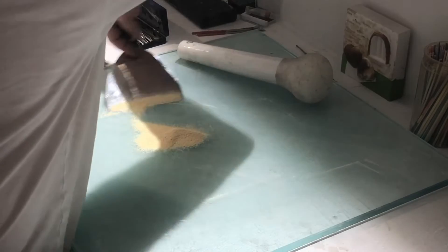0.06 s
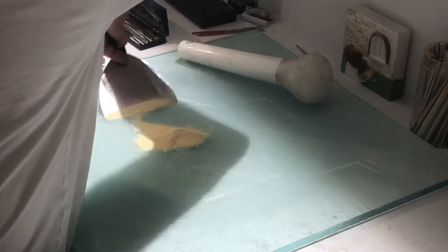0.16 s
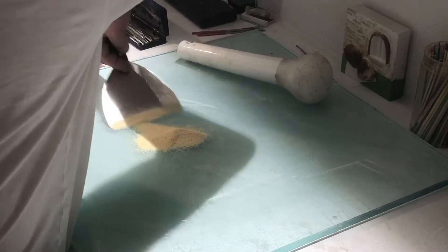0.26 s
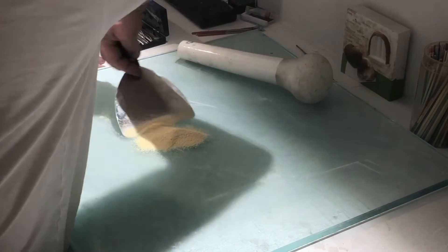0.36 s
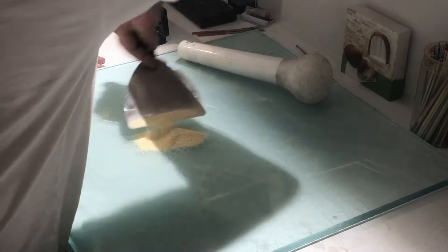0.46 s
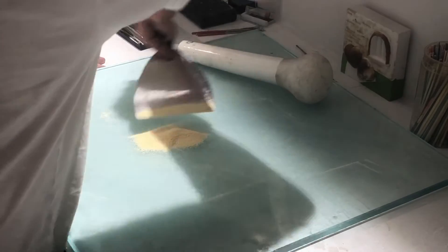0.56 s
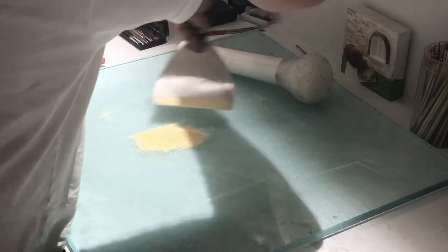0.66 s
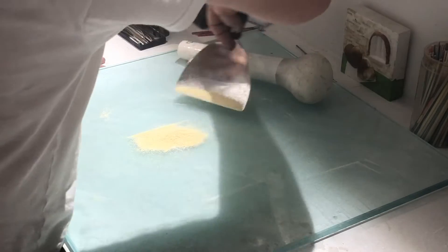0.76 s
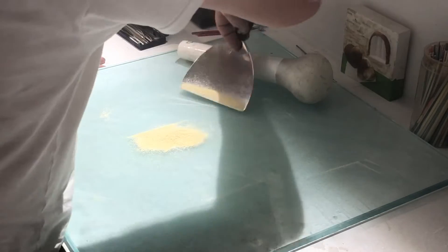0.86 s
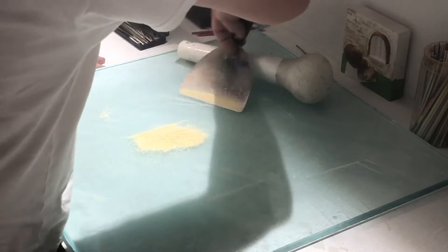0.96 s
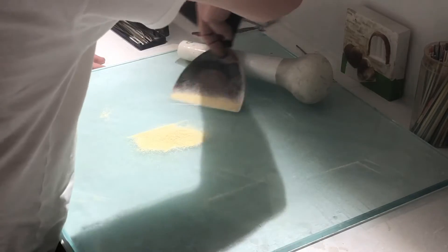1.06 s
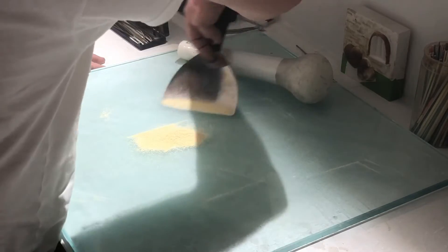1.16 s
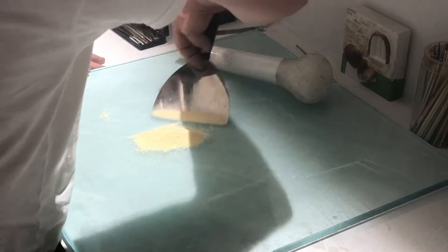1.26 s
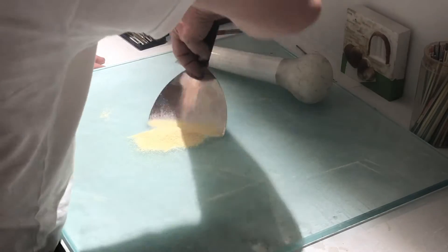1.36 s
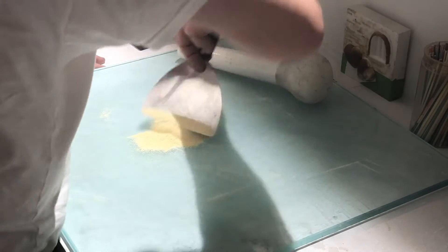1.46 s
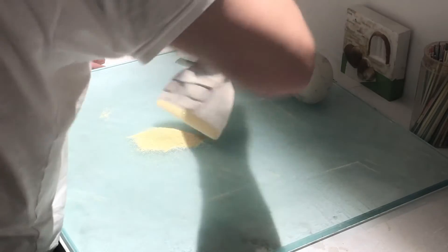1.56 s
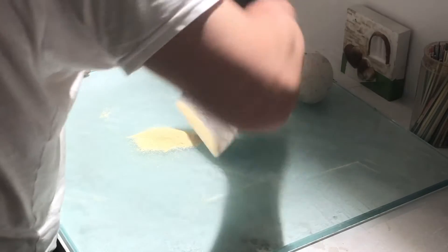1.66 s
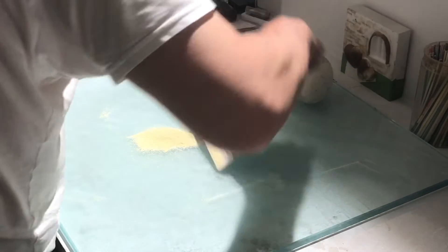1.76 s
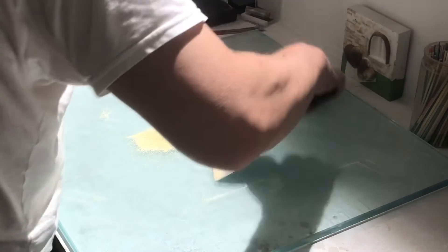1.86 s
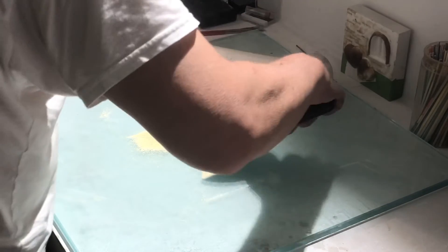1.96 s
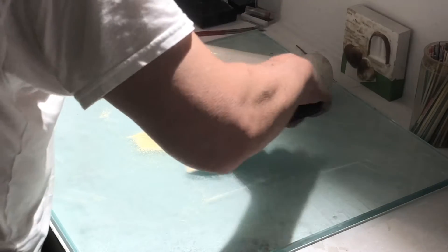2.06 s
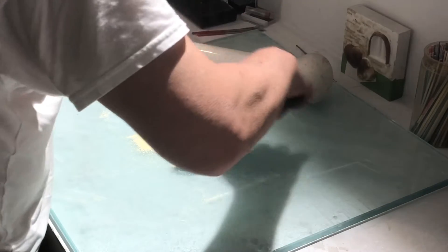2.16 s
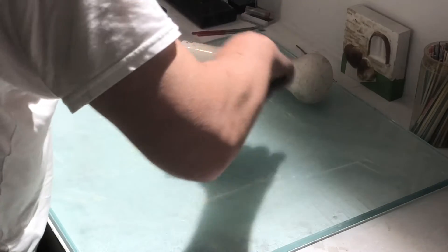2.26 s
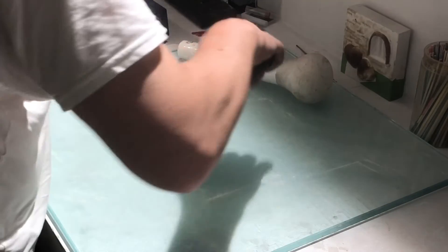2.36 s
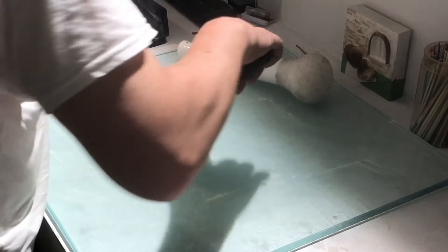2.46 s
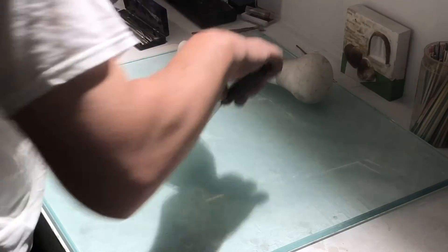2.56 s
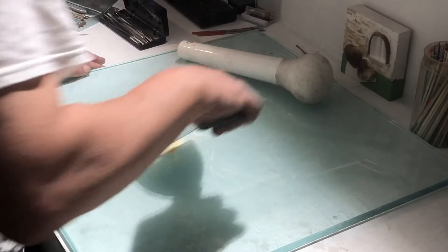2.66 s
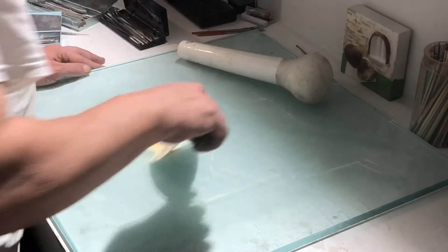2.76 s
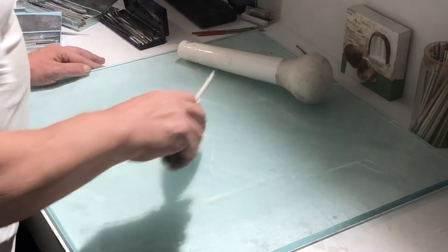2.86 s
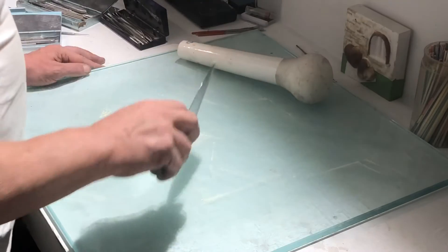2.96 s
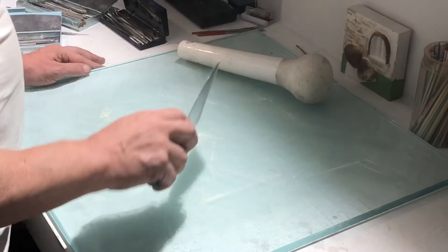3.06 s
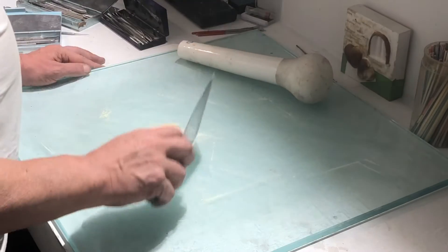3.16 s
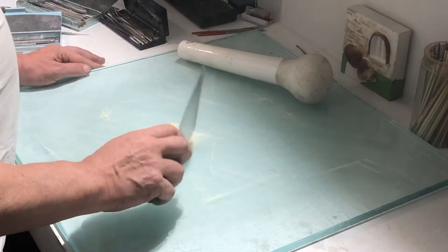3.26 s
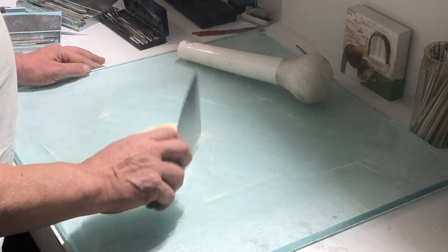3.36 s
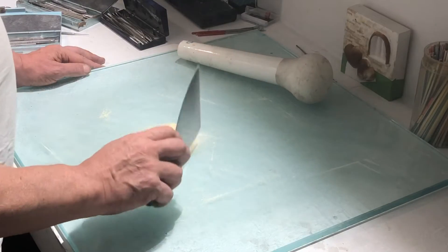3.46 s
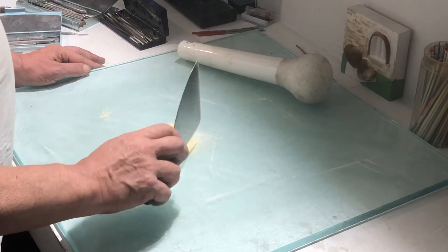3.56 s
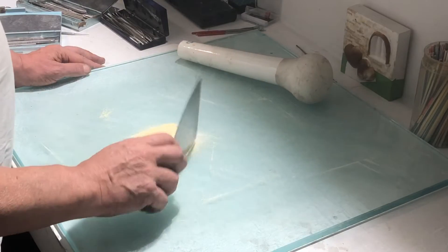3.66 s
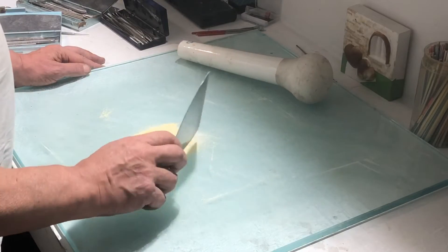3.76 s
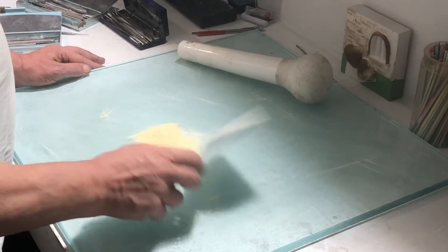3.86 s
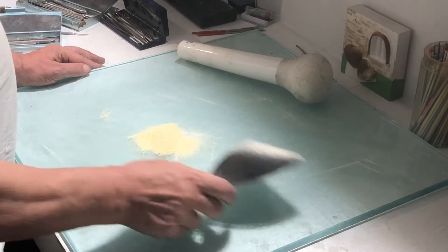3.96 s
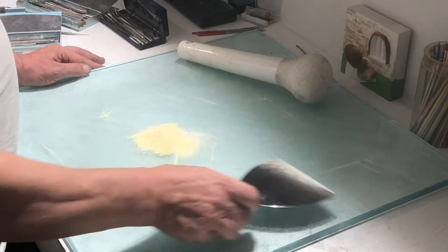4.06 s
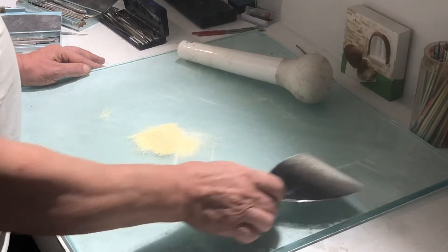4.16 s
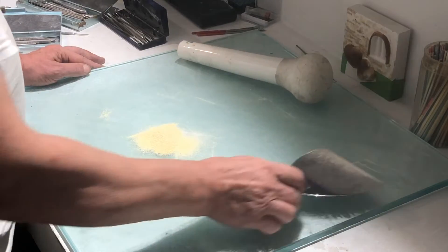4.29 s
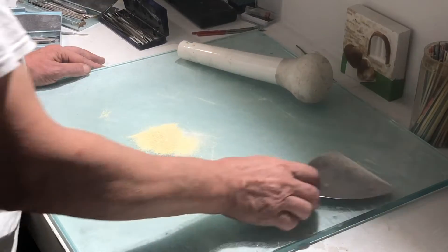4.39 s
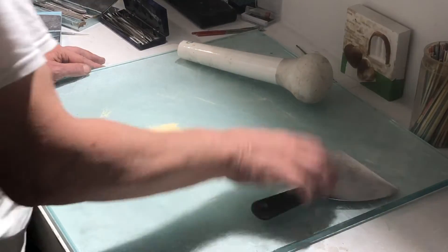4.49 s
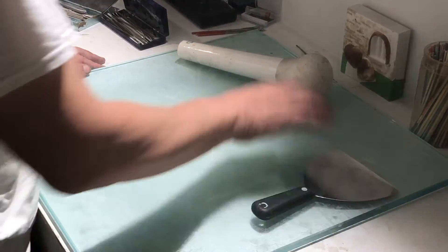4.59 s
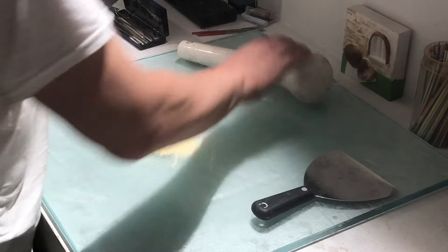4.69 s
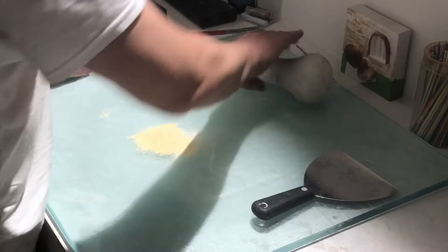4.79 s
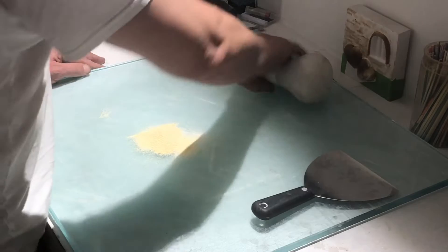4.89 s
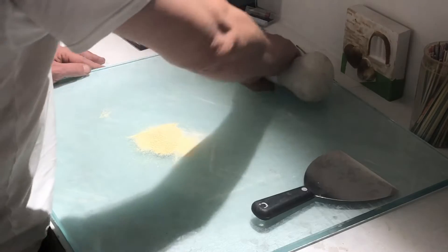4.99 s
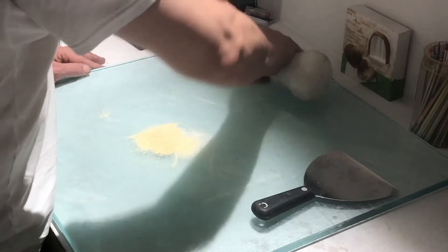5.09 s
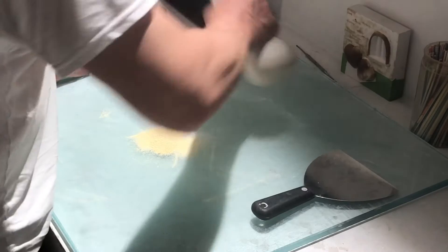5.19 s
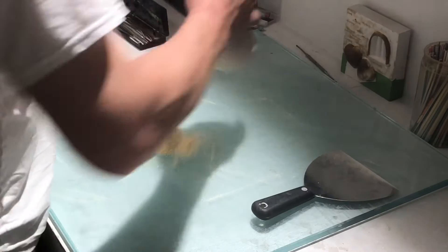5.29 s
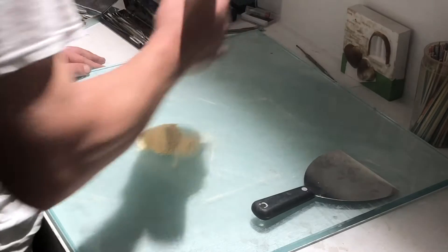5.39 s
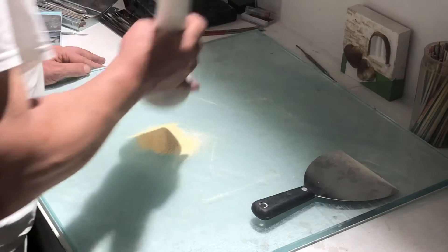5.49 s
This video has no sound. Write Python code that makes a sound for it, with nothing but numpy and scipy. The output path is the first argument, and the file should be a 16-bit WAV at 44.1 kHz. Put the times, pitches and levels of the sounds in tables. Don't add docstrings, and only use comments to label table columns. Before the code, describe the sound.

Close-miked indoors: three faint gritty strokes of a scraper through fine powder, the steel edge singing softly. After near silence come three sharp raps on glass, a bright one and two firmer, with table thump and short room echo. A quick last swish, a light metal clatter as the tool is put down, then barely audible touches as a pestle is lifted over soft air noise.

```python
import sys
import numpy as np
from scipy import signal
from scipy.fft import rfft, irfft, next_fast_len
from scipy.io import wavfile
from scipy.ndimage import uniform_filter1d, map_coordinates

SR = 44100
rng = np.random.default_rng(int(sys.argv[2]) if len(sys.argv) > 2 else 0)


def wav_out(sig):
    wavfile.write(sys.argv[1], SR, np.round(np.clip(np.atleast_2d(sig).T, -1, 1) * 32767).astype(np.int16))


def makeup_ratio(level_db):
    decades = np.asarray(level_db, float) / 20
    return 10 ** decades


N = 243873


def unit(x):
    return x / np.sqrt(np.mean(x ** 2) + 1e-20)


def along(points, hz):
    f, value = np.transpose(points)
    return np.interp(np.log(hz + 1), np.log(f + 1), value)


def wobble(rate):
    knots = rng.standard_normal(int(N * rate / SR) + 4)
    return map_coordinates(knots, [np.arange(N) * rate / SR])


def filtered(x, response):
    m = next_fast_len(len(x) + 8192)
    return irfft(rfft(x, m) * response(np.fft.rfftfreq(m, 1 / SR)), m)[:len(x)]


def coloured(x, spectrum):
    return unit(filtered(x, lambda hz: makeup_ratio(along(spectrum, hz))))


def resonances(peaks):
    def response(f):
        total = 0
        for k, (centre, width, db) in enumerate(peaks):
            loss = 1j * f * width
            total = total + (-1) ** k * makeup_ratio(db) * loss / (centre * centre - f * f + loss)
        return total
    return response


def swell(peak_s, db, rise_s, fall_s):
    t = np.arange(N) / SR - peak_s
    distance = np.where(t < 0, -t / rise_s, t / fall_s)
    return makeup_ratio(db - 27 * distance ** 1.3)


def ring(pitches_hz, modes, t, scatter_db, split):
    db, t60 = np.transpose(modes)[:, :, None]
    chance = rng.standard_normal((3, *db.shape))
    decay = np.exp(-np.log(1000) * t / np.clip(t60, .01, .6))
    level = makeup_ratio(db + scatter_db * chance[0]) * decay
    phase = (2 * np.pi * np.c_[pitches_hz] * t).astype(np.float32)
    twin = (phase * (1 + split * chance[1]) + np.pi * chance[2]).astype(np.float32)
    return (level * (np.sin(phase) + 0.59 * np.sin(twin))).sum(axis=0) / np.sqrt(len(modes))


# f/Hz, t60/s
ROOM = [(200, 0.58), (1000, 0.32), (3000, 0.39), (7000, 0.34), (14000, 0.2)]


def tail():
    hz, t, z = signal.stft(rng.standard_normal(SR // 2), SR, nperseg=256)
    fading = z * makeup_ratio(-60 * t / along(ROOM, hz)[:, None])
    x = signal.istft(fading, SR, nperseg=256)[1]
    return x / np.linalg.norm(x)


# f/Hz, level/dB per Hz
AIR = [(240, -53), (400, -12), (545, -2.5), (755, -2), (1130, -8.5), (1650, -8), (2840, -10), (3420, -16),
       (4500, -19.5), (6000, -20), (7500, -27), (11000, -31), (14600, -33), (16000, -42)]
# f/Hz, level/dB per Hz
SWAY = [(8, -33.5), (16, 2.5), (30, -2), (44, 4.5), (56, -9), (75, -40.5), (200, -120)]
# f/Hz, level/dB per Hz
DRONE = [(35, -35.5), (60, -5), (80, 1.5), (100, -8), (121, 0.5), (140, -6), (165, -15), (250, -10.5),
         (305, -7), (335, -11), (380, -11), (450, -25.5), (580, -40.5), (990, -120)]
# t/s, level/dB, rise/s, fall/s
WHINE_SWELL = (3.5, -82, 3.7, 1.5)


def background():
    air = makeup_ratio(-63.5 + 0.34 * wobble(2.2)) * coloured(rng.standard_normal(N), AIR)
    sway = makeup_ratio(-72.5 + 1.2 * wobble(2.2)) * coloured(rng.standard_normal(N), SWAY)
    drone = makeup_ratio(-71.5 + 0.88 * wobble(4.6)) * coloured(rng.standard_normal(N), DRONE)
    phase = 2 * np.pi * np.cumsum(1595 + 0.74 * wobble(13)) / SR
    whine = (makeup_ratio(-77) + swell(*WHINE_SWELL)) * makeup_ratio(2.1 * wobble(10))
    return air + sway + drone + np.sqrt(2) * whine * np.sin(phase)


def far_rooms():
    late_db, t60 = -38.5, 0.73
    t = np.arange(N) / SR
    level = sum(makeup_ratio(db + late_db - 60 * np.abs(t - s) / t60) * (t > s) for s, db, *_ in KNOCKS)
    return level * coloured(rng.standard_normal(N), AIR)


# t/s, level/dB, rise/s, fall/s
SHAKES = [
    (4.48, -53, 0.058, 0.16),
    (4.95, -58.5, 0.085, 0.14),
    (5.06, -65, 0.065, .04),
]


def shakes():
    shaking = unit(filtered(rng.standard_normal(N), resonances([(77.6, 26, 0)])))
    return sum(swell(*shake) for shake in SHAKES) * shaking


TABLE_HZ = [73, 131, 212, 249.5, 350]
# level/dB, t60/s
TABLE = [(-5, 0.15), (-10.5, 0.14), (-0.5, 0.076), (0, .09), (-11, .07)]
# t/s, peak level/dB
THUDS = [
    (3.171, -41.5),
    (3.414, -38),
    (3.662, -37.5),
    (4.445, -53.5),
    (4.986, -73),
]


def thuds():
    out, t = np.zeros(N + SR), np.arange(SR // 2) / SR
    for s, db in THUDS:
        boom = (1 - np.exp(-t / 0.0039)) * ring(TABLE_HZ, TABLE, t, scatter_db=0.9, split=0.033)
        out[round(s * SR):][:len(t)] += makeup_ratio(db + 7.5) * boom
    return out[:N] + makeup_ratio(-14.0) * signal.fftconvolve(out, tail())[:N]


# t/s, peak level/dB, centre f/Hz, t60/s
TICKS = [(.918, -56, 13100, .015), (.952, -58, 12500, .02), (1.853, -59, 4500, 0.035),
         (1.885, -60, 4500, 0.022), (1.934, -58, 10000, 0.033), (2.068, -53, 12000, .03),
         (2.780, -53, 2500, 0.022), (4.3663, -47.5, 3300, .12), (4.456, -46.5, 1000, 0.26),
         (4.896, -56, 13500, 0.0073), (4.984, -51.5, 1860, 0.075), (5.39, -69, 6560, .02)]


def ticks():
    out, t = np.zeros(N + SR), np.arange(SR // 8) / SR
    for s, db, centre_hz, t60 in TICKS:
        body = resonances([(centre_hz, .45 * centre_hz, 0)])
        puff = unit(filtered(rng.standard_normal(len(t)), body))
        out[round(s * SR):][:len(t)] += makeup_ratio(db - 5.0 - 60 * t / t60) * puff
    return out[:N]


# f/Hz, level/dB per Hz
CRACK = [(150, -38.5), (330, -18), (500, -22.5), (800, -7), (1100, -6), (1400, -9.5), (1850, 2.5),
         (2800, -1), (4400, -1.5), (6500, -8.5), (8700, -13), (11000, -15.5), (15800, -22), (16900, -50)]


def crack(t, t60):
    burst = rng.standard_normal(len(t)) * makeup_ratio(-60 * t / t60)
    uneven = np.sqrt(uniform_filter1d(np.abs(rfft(burst)) ** 2, size=70))
    even = irfft(rfft(burst) / uneven, len(t))
    return 0.086 * coloured(even, CRACK) * (t < 4 * t60)


GLASS_HZ = [651, 762, 945, 1225, 1636, 1867, 2090, 2394, 2856, 3024, 3208, 3715, 4065, 4170, 4341, 4512,
            4680, 5055, 5403, 5790, 5897, 6598, 6970, 7210, 7766, 8487, 8607, 9970]
# level/dB, t60/s
GLASS = [(1, 0.09), (-7, 0.07), (-6.5, 0.06), (-7, 0.09), (0, 0.058), (-9, 0.18), (-13, 0.044),
         (-25.5, 0.045), (-2.5, 0.047), (-8, .07), (-9, .07), (-14, 0.047), (-8, .07), (-5.5, 0.06),
         (-2.5, 0.087), (0.5, .07), (-4.5, 0.074), (-9, .07), (-1.5, .07), (-6, .07), (3, 0.068),
         (-12, 0.08), (2, .07), (-17, .07), (3, .06), (-8, 0.082), (-1, .05), (-14.5, .04)]
BLADE_HZ = [1582, 2395, 3194, 3350, 3458, 3702, 4116, 4370, 4695, 5006, 5532, 5785, 6388, 6530, 7332, 7660,
            7862, 8245, 8660, 9258, 9720, 10675, 11265, 11880, 12513, 13260, 15070]
# delay t/s, level/dB
WALLS = [(.0028, -2), (.0052, -4), (.0105, -7), (.0128, -8), (.019, -13), (.026, -16)]


def contacts(events, blade, glass_db, crack_t60, swell_s, wet_db, alike, lowest_hz, size):
    out, t = np.zeros(N + 2 * SR), np.arange(size) / SR
    spot = crack(t, crack_t60)
    for s, db, treble_db, blade_db, struck_hz in events:
        slab_db = glass_db + min(db + 28, 0)
        snap = alike * spot + np.sqrt(1 - alike ** 2) * crack(t, crack_t60)
        slab = makeup_ratio(slab_db) * ring(GLASS_HZ, GLASS, t, scatter_db=2.5, split=0.014)
        near = (1 - np.exp(-t / swell_s)) * (snap + slab)
        treble = (1 - np.exp(-t / .0003)) * np.diff(snap, n=2, prepend=[0, 0])
        near = near + makeup_ratio(treble_db + 8.5) * treble
        echoes = sum(makeup_ratio(level) * np.roll(near, round(lag * SR)) for lag, level in WALLS)
        favour_db = 11 * np.exp(-(np.log(np.array(BLADE_HZ) / struck_hz) / 0.11) ** 2)
        favoured = blade + np.outer(favour_db, [1, 0])
        near = near + makeup_ratio(blade_db) * ring(BLADE_HZ, favoured, t, scatter_db=0.0, split=.009)
        heard = near + filtered(echoes, lambda hz: 1 / (1 + 1j * hz / 6000))
        heard = heard + makeup_ratio(wet_db) * signal.fftconvolve(near + 0.5 * snap, tail())[:len(t)]
        heard = signal.lfilter(*signal.butter(2, lowest_hz, "high", fs=SR), heard)
        out[round((s - .0004) * SR):][:len(t)] += makeup_ratio(db - 3.5) * heard
    return out[:N]


# level/dB, t60/s
LYING = [(4, 0.059), (-10, 0.56), (-4, 0.11), (3, 0.059), (-3.5, 0.12), (-25, .25), (-25, .2), (-4, 0.16),
         (-3.5, 0.16), (-4.5, 0.18), (-4, 0.16), (-1, 0.098), (-20, 0.18), (2, 0.083), (-6, .15), (-19, .2),
         (-22, 0.19), (-27, 0.16), (-24, .1), (-11, 0.18), (-3, 0.097), (-9, .13), (-8, 0.096), (0, .1),
         (-1, .1), (-17, .1), (-14, .07)]
# t/s, peak level/dB, treble level/dB, blade ring level/dB, favoured f/Hz
RATTLE = [(4.444, -29.5, -21, -3.5, 3330), (4.4555, -32.5, -4, 6.5, 9800), (4.463, -29, 0, -19, 5500),
          (4.485, -38, 0.5, 0.5, 4900), (4.495, -38.5, -3, -20, 9700), (4.512, -40, -3, -10, 5420),
          (4.545, -71, -18, 1.5, 7800), (4.568, -70, -18, -2, 4730), (4.588, -52, -15, 1, 5100)]


def rattle():
    rocking = contacts(RATTLE, LYING, glass_db=-5.5, crack_t60=0.016, swell_s=0.001, wet_db=-7,
                       alike=0.074, lowest_hz=794, size=SR // 4)
    rest_s, damping_db_per_s = 4.62, 300
    resting_s = np.clip(np.arange(N) / SR - rest_s, 0, 1)
    return rocking * makeup_ratio(-damping_db_per_s * resting_s)


# level/dB, t60/s
HELD = [(-24.5, .2), (-14, .4), (-14, 0.17), (-12, 0.36), (-13.5, 0.36), (-7.5, 0.15), (-18, 0.36),
        (-19.5, 0.28), (-8, 0.5), (-9, .22), (-10, 0.5), (-8, .25), (-16, .25), (3.5, .15), (-7.5, .22),
        (-12, .15), (-9, 0.1), (-12, .2), (-2, .08), (7.5, 0.11), (-13.5, 0.14), (-0.5, .15), (-1.5, 0.14),
        (-14.5, .1), (-10.5, .09), (1, 0.13), (-10, .07)]
# t/s, peak level/dB, treble level/dB, blade ring level/dB, favoured f/Hz
KNOCKS = [
    (3.170, -21, -6, -3, 3440),
    (3.4119, -11.5, -36.5, -18, 6800),
    (3.660, -11.5, -34, -30.5, 6870),
]


def knocks():
    return contacts(KNOCKS, HELD, glass_db=-3.5, crack_t60=0.022, swell_s=0.00096, wet_db=-12,
                    alike=0.89, lowest_hz=253, size=SR // 2)


def grit(spread_db):
    return unit(rng.standard_normal(N) * makeup_ratio(spread_db * rng.exponential(size=N)))


# t/s, hiss level/dB, rise/s, fall/s, blade song level/dB above the hiss
STROKES = [
    [(.05, -62.5, 0.22, 0.28, -5), (.325, -59, 0.25, 0.1, 3.5)],
    [(1.17, -62.5, 0.21, 0.29, 4), (1.194, -53.5, 0.04, 0.15, -34), (1.33, -69, 0.16, 0.08, 4)],
    [(1.854, -62.5, 0.013, 0.076, 4), (1.94, -65, 0.017, 0.034, 4), (2.074, -61, 0.18, 0.19, 6)],
    [(4.373, -55.5, 0.0081, 0.12, 2.5)],
]
# f/Hz, width/Hz, level/dB
SONGS = [
    [(1652, 45, 3), (2640, 28, 6), (3360, 35, -4), (3890, 35, -5)],
    [(1900, 500, -8), (3000, 400, -9), (4860, 600, -12)],
    [(1590, 70, -1), (2100, 60, -2), (2540, 60, -7), (3560, 110, -8)],
    [(3024, 90, -7), (3380, 90, -8), (5515, 30, 0), (6700, 60, -5), (8200, 80, -8), (10573, 45, 1)],
]
# f/Hz, level/dB per Hz
POWDER = [(1760, -6), (3000, -13), (4450, -5), (4800, -2), (5320, -3), (11500, 1), (15600, -1)]
# t/s, hiss level/dB, rise/s, fall/s
BRUSHES = [(2.76, -75, .08, .1), (4.1, -74, .04, .04), (4.894, -75, 0.059, .08), (4.974, -72, 0.055, .03),
           (5.396, -71, .006, .06)]


def strokes():
    pushes = [push[:4] for stroke in STROKES for push in stroke] + BRUSHES
    pressure = sum(swell(*push) for push in pushes) * makeup_ratio(1.2 * wobble(44))
    sound = pressure * coloured(grit(spread_db=2.5), POWDER)
    for stroke, song in zip(STROKES, SONGS):
        broad = song + [(2660, 1730, -10.5)]
        level = sum(swell(*push[:4]) * makeup_ratio(push[4]) for push in stroke)
        level = level * makeup_ratio(0.66 * wobble(30.26))
        sound = sound + level * unit(filtered(grit(spread_db=2.5), resonances(broad)))
    return makeup_ratio(-3.15) * sound


def scene():
    room = background() + far_rooms()
    table = shakes() + thuds()
    scraper = ticks() + rattle() + knocks() + strokes()
    return (room + table + scraper)[None]


def top_cut(x):
    return signal.sosfilt(signal.butter(12, 17010, fs=SR, output="sos"), x)


# f/Hz, level/dB
EDGE = [(15000, -1), (15700, -4), (15900, -8.5), (16900, -22.5), (17150, -68)]


def record(dry):
    limited = filtered(dry[0], lambda hz: makeup_ratio(along(EDGE, hz)))
    return top_cut(limited[None])


dry = scene()
out = record(dry)
wav_out(out)
```